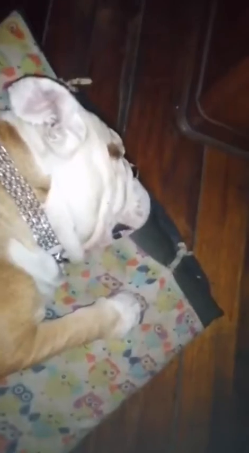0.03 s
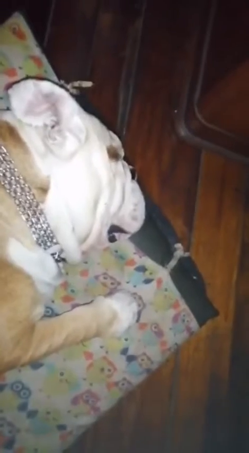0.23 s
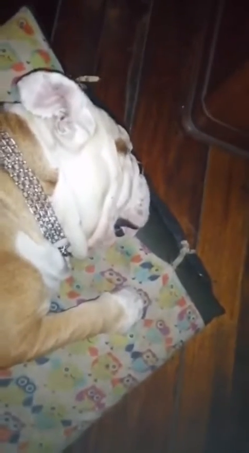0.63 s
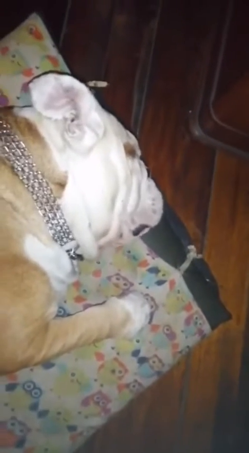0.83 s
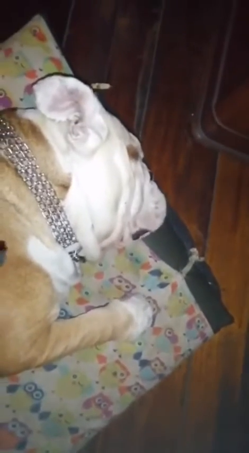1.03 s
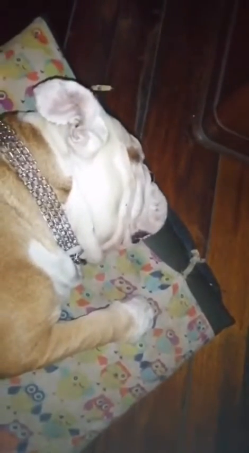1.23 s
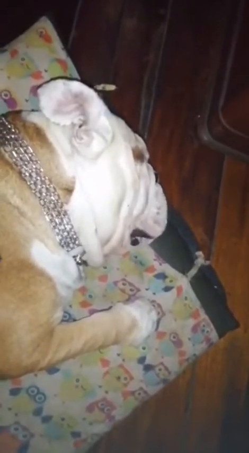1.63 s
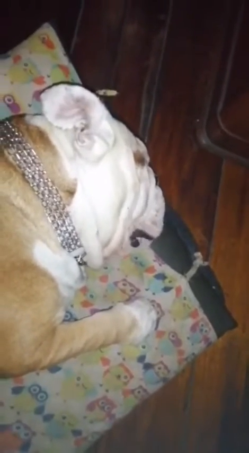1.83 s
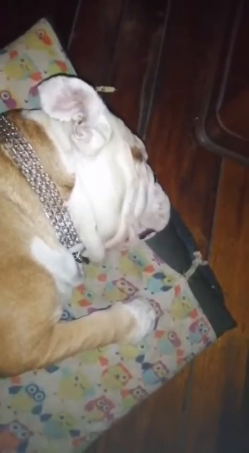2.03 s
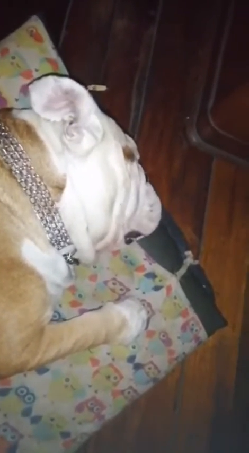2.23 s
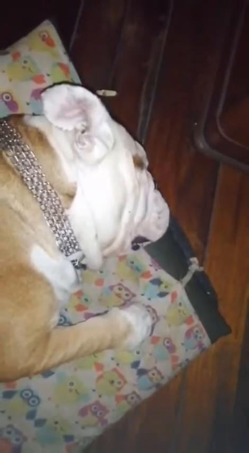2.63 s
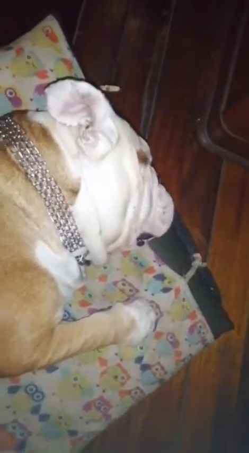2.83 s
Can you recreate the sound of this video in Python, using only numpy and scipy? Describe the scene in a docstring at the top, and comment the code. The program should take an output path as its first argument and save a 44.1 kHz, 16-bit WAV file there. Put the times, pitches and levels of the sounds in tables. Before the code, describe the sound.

A sleeping dog snores close to the microphone in a quiet room. Soft throaty clicks build into a rattling snore with a thin nasal hiss. A second snore follows, tightening into a short squeak and a soft puff.

```python
"""A quiet room, with the microphone close to a bulldog snoring on its cushion.
Its soft palate slaps shut singly, then in quick bouts, ringing a throat that widens and narrows twice.
Air rattles past the palate and hisses and whistles in the nose; the flutter tightens into a short
squeak, and a soft puff follows. Behind the dog are a short room tail and faint room tone."""
import sys
import numpy as np
from scipy import signal
from scipy.fft import rfft, irfft
from scipy.io import wavfile
from scipy.ndimage import uniform_filter1d

SR = 44100
rng = np.random.default_rng(int(sys.argv[2]) if len(sys.argv) > 2 else 0)


def output_pcm(signal):
    """Save a mono or channel-first signal as 16-bit PCM at the path in sys.argv[1].

    Samples are clipped to [-1, 1] before scaling.
    """
    pcm = np.clip(np.atleast_2d(signal).T, -1, 1) * 32767
    wavfile.write(sys.argv[1], SR, np.round(pcm).astype(np.int16))


N = 127890
T = np.arange(N) / SR
HZ = np.fft.rfftfreq(N, 1 / SR)


def amp(db):
    """Decibels to gain."""
    return 10 ** (np.asarray(db) / 20)


def unit_rms(x):
    """Scales to unit rms."""
    return x / np.sqrt(np.mean(x ** 2) + 1e-20)


def curve(rows, column=1):
    """One column of a time table at every sample."""
    rows = np.array(rows)
    return np.interp(T, rows[:, 0], rows[:, column])


def spectrum(points):
    """A frequency table at every bin."""
    hz, value = np.transpose(points)
    return np.interp(np.log(HZ + 1), np.log(hz + 1), value)


def pan(db):
    """Left and right gains whose mean is one."""
    gains = np.array([amp(db / 2), amp(-db / 2)]).reshape(2, -1)
    return gains / gains.mean(0)


def wander(hz):
    """Random drift of unit rms, mostly slower than hz."""
    return unit_rms(irfft(rfft(rng.standard_normal(N)) * np.exp(-(HZ / hz) ** 2), N))


def resonate(x, hz, width_hz):
    """A resonance of gain one whose centre follows hz."""
    turn = np.exp(2j * np.pi * np.cumsum(hz * np.ones(N)) / SR)
    pole = np.exp(-np.pi * width_hz / SR)
    return 2 * (turn * signal.lfilter([1 - pole], [1, -pole], x / turn + 1e-18)).real


def cut(x, hz, kind, order=2):
    """Low-pass or high-pass."""
    return signal.sosfilt(signal.butter(order, hz, kind, fs=SR, output="sos"), x)


# Likeness of left and right at the microphone: (frequency [Hz], correlation [ratio])
STEREO_LIKENESS = [(50,0.82),(500,0.69),(1500,0.26),(4000,0.31),(12000,0.088)]

def noise(colour):
    """Coloured noise, most alike left and right in the bass."""
    left, other = rfft(rng.standard_normal((2, N)))
    alike = spectrum(STEREO_LIKENESS)
    right = alike * left + np.sqrt(1 - alike ** 2) * other
    return unit_rms(irfft(np.array([left, right]) * amp(spectrum(colour)), N))


# The quiet room behind the dog: (frequency [Hz], gain [dB])
ROOM_TONE_COLOUR = [(25,-44),(55,-13.5),(84,-6),(120,-12.5),(1000,-29.5),(6000,-46.5),(7800,-43)]

def room_tone(level_db=-61.5):
    """A faint, steady, low rush all around the microphone."""
    return amp(level_db) * noise(ROOM_TONE_COLOUR)


# Floor and furniture near the microphone: (delay [s], left gain [ratio], right gain [ratio])
REFLECTIONS = [(.0034,0.028,0.6),(0.0151,0.11,0.35)]

def room(x, tail_db=-7, t60_s=0.24, onset_s=0.01, bass_edge_hz=283):
    """The direct sound, two reflections and a short diffuse tail; the room returns little bass."""
    t = T[:SR // 2]
    tail = rng.standard_normal((2, len(t))) * amp(-60 * t / t60_s) * (t > onset_s)
    tail = tail + 0.21 * tail[::-1]  # each side spills into the other
    tail *= amp(tail_db) / np.linalg.norm(tail[0])
    for delay, left, right in REFLECTIONS:
        tail[:, round(delay * SR)] += left, right
    wet = signal.fftconvolve(x, tail, axes=1)[:, :N]
    return x + irfft(rfft(wet) * HZ ** 2 / (HZ ** 2 + bass_edge_hz ** 2), N)


# The last puff, close by: (time [s], level [dB])
PUFF_ENVELOPE = [(2.76,-70),(2.81,-45),(2.85,-50.5),(2.9,-45.5)]
# Its colour: (frequency [Hz], gain [dB])
PUFF_COLOUR = [(110,-24),(240,2.5),(340,-10.5),(550,1),(950,-9.5),(1170,-16.5),(4000,-73.5)]

def puff():
    """A soft, dull breath after the squeak."""
    return noise(PUFF_COLOUR) * amp(curve(PUFF_ENVELOPE))


# Whistling at the nostrils: (time [s], level [dB])
WHISTLE_ENVELOPE = [(1.01,-87),(1.05,-50),(1.09,-45.5),(1.16,-57.5),(1.3,-58),(1.39,-73),(1.47,-58.5),(1.78,-59),(2.12,-74),(2.38,-64.5),(2.58,-64),(2.67,-85)]
# Their resonances: (frequency [Hz], width [Hz], gain in first snore [dB], gain in second [dB])
NOSTRIL_MODES = [(3010,640,-6.5,-5),(4740,190,-15.5,-7.5),(5490,410,-6,-13),(6320,420,-6,6),(9000,470,-2.5,-5),(9680,350,-2.5,-11)]

def whistle(second_snore_s=1.9, shift_s=0.35):
    """Air sings in narrow, drifting resonances of the nostrils; their balance shifts in the second snore."""
    second = np.clip((T - second_snore_s) / shift_s, 0, 1)
    out = np.zeros((2, N))
    for hz, width, first_db, second_db in NOSTRIL_MODES:
        centre = hz * (1 + 0.005 * wander(6))
        band = resonate(rng.standard_normal(N), centre, width)
        tone = unit_rms(resonate(band, centre, width))
        sides = pan(np.interp(hz, HZ, spectrum(NOSE_PAN)))
        out += sides * tone * amp(first_db + second * (second_db - first_db))
    return out * amp(curve(WHISTLE_ENVELOPE) + 2.3 * wander(60))


# Hiss at the nose, close up: (time [s], level [dB])
HISS_ENVELOPE = [(.45,-73.5),(.6,-56),(.98,-59),(1.08,-53.5),(1.38,-60),(1.72,-59.5),(1.76,-56.5),(2.12,-65),(2.58,-66),(2.7,-74.5),(2.83,-69),(2.89,-47.5)]
# Its colour: (frequency [Hz], gain [dB])
HISS_COLOUR = [(1900,-4),(2400,-10),(3100,-7),(3900,-14),(5700,-2),(6800,-4),(7800,-22),(9500,-18.5),(11500,-55.5)]
# Rush of air through the wide throat: (frequency [Hz], gain [dB])
RUSH_COLOUR = [(900,-29),(1650,2.5),(2200,0.5),(2800,-23),(6000,-4.5),(7900,-25),(10000,-19),(15000,-38.5)]
# Where the nose sits at the microphone: (frequency [Hz], left over right [dB])
NOSE_PAN = [(2000,-3),(6800,-9.5),(8800,18),(13000,12)]

def nose(hits, spurt_s=0.006, spurt_db=16.5, rush_db=-16, rush_db_per_hz=0.25):
    """Hiss and rush of air spurt at each slap; the rush fades as the throat narrows."""
    spurts = signal.lfilter([1], [1, -np.exp(-1 / (spurt_s * SR))], hits)
    pulsing = np.exp(0.28 * wander(62)) * (1 + amp(spurt_db) * uniform_filter1d(spurts, size=130))
    narrowing_db = rush_db_per_hz * (curve(THROAT_MODES) - WIDE_HZ)
    hiss = noise(HISS_COLOUR) * amp(curve(HISS_ENVELOPE))
    rush = noise(RUSH_COLOUR) * amp(rush_db + curve(RATTLE_ENVELOPE) + narrowing_db)
    return irfft(rfft((hiss + rush) * pulsing) * pan(spectrum(NOSE_PAN)), N)


# The closing squeak: (time [s], pitch [Hz], level [dB])
SQUEAK_PATH = [(2.47,410,-48),(2.515,420,-28),(2.55,441,-25),(2.58,434,-19.5),(2.595,420,-24),(2.607,385,-38),(2.645,430,-39),(2.67,470,-52),(2.712,497,-34),(2.745,500,-58)]

def squeak(harmonics_db=(0, -0.5, -29.5, -41), pure_from_s=2.68):
    """The tightened palate sings briefly and ends in a pure tone."""
    phase = 2 * np.pi * np.cumsum(curve(SQUEAK_PATH) * (1 + 0.0036 * wander(100))) / SR
    bright = np.clip((pure_from_s - T) / 0.016, 0, 1)
    tone = sum(amp(db) * np.sin((k + 1) * phase) * bright ** k for k, db in enumerate(harmonics_db))
    sounding = (T > SQUEAK_PATH[0][0]) * (T < SQUEAK_PATH[-1][0])
    return tone * amp(curve(SQUEAK_PATH, column=2)) * sounding


# How strongly the palate shakes the chest: (time [s], gain [dB])
CHEST_DRIVE = [(.25,-53),(.6,-27),(.9,-26),(1.12,-7),(1.4,-3.5),(1.62,-13),(1.9,-18.5),(2.3,-4),(2.6,-16.5)]
# The chest from close by: (frequency [Hz], gain [dB])
CHEST_COLOUR = [(30,-29.5),(55,-12),(80,0),(195,-3.5),(245,4),(330,-11.5),(900,-50.5)]

def chest(drive):
    """The chest answers the palate with a low thud."""
    cepstrum = irfft(np.log(amp(spectrum(CHEST_COLOUR))), N)
    causal = cepstrum * (1 + np.sign(np.fft.fftfreq(N)))  # rings only after the blow
    ring = irfft(np.exp(rfft(causal)), N)[:SR // 10]
    thud = signal.fftconvolve(drive * amp(curve(CHEST_DRIVE)), ring)[:N]
    return cut(thud, 4000, "low")


# The throat's two lowest resonances: (time [s], first [Hz], second [Hz])
THROAT_MODES = [(.25,543,864),(.53,722,805),(.68,751,1220),(.81,779,1066),(.88,638,825),(.93,538,910),(1.02,523,813),
                (1.35,437,773),(1.58,511,937),(1.72,660,923),(1.76,792,1104),(2,780,1000),(2.1,577,980),(2.22,483,805),(2.65,468,878)]
# Its third, which sinks and grows as the throat narrows: (time [s], frequency [Hz], gain [dB])
THIRD_MODE = [(.25,1430,-18),(.5,1562,-14.5),(.88,1606,-17.5),(.96,1136,-12),(1.11,1060,-15),(1.24,1530,-17.5),(1.93,1573,-20),(2.06,1160,-13.5),(2.22,1030,-17.5),(2.34,1600,-20)]
NARROW_HZ, WIDE_HZ = 473.6, 811.6  # first resonance of a narrow and a wide throat

def throat(drive):
    """Four moving resonances; the lower two are damped more as the throat opens."""
    first, second, third = curve(THROAT_MODES), curve(THROAT_MODES, column=2), curve(THIRD_MODE)
    opening = np.clip((first - NARROW_HZ) / (WIDE_HZ - NARROW_HZ), 0, 1)
    narrow = resonate(drive, first, width_hz=100) + amp(-3) * resonate(drive, second, width_hz=126)
    wide = resonate(drive, first, width_hz=138) + amp(-3) * resonate(drive, second, width_hz=138)
    ring = np.sqrt(1 - opening) * cut(narrow, 1025, "low", order=7)
    ring += np.sqrt(opening) * amp(-1.5) * cut(wide, 1167, "low", order=5)
    for hz, db in (third, 0), (third * 1.246, -16.5):  # the fourth follows the third
        band = resonate(drive, hz, width_hz=240)
        ring += amp(db + curve(THIRD_MODE, column=2)) * resonate(band, hz, width_hz=240)
    return cut(cut(ring, 2200, "low", order=8), 390, "high", order=4)


# Air rattling past the palate: (time [s], relative level [dB])
RATTLE_ENVELOPE = [(.54,-69),(.59,-35),(.67,-22.5),(.78,-33),(.9,-27.5),(1.05,-24.5),(1.25,-31.5),(1.38,-45.5),(1.62,-41),(1.82,-30.5),(2.12,-30.5),(2.52,-25),(2.57,-52),(2.64,-28.5),(2.68,-73)]

def rattle(flutter_hz=127.2, jitter=0.3, swing_db=3, gain_db=17.5):
    """The palate flutters unevenly, letting a puff of air through at each beat."""
    cycles = np.cumsum(flutter_hz * np.exp(jitter * wander(90))) / SR
    beats = np.diff(np.floor(cycles), prepend=0) * amp(swing_db * wander(74))
    puffs = np.exp(-(cycles % 1) / 0.2) * rng.standard_normal(N)
    air = unit_rms(unit_rms(beats) + 0.43 * unit_rms(puffs)) * amp(curve(RATTLE_ENVELOPE) + gain_db)
    dull = resonate(air, 0.63 * curve(THROAT_MODES, column=2), width_hz=465)
    return dull + 0.17 * air  # a little raw air gives bite


# Single slaps of the palate: (time [s], relative level [dB])
SINGLE_SLAPS = [(.2638,-17),(.3992,-16.5),(.4834,-11.5),(.5228,-10),(.5621,-7),(.729,-13),(.7345,-5.5),(.7775,-11),(.7835,-5.5),(.884,-8),(.9647,-6.5),(1.776,-9.5),(1.7968,-7),(1.8085,-12),(1.8458,-9),(1.887,-7.5),(1.937,-11),(1.947,-10.5),(1.9838,-8),(1.992,-13),(2.021,-14)]
# Quick bouts: (time [s], relative level of first slap [dB], length [s], slap spacing [s])
SLAP_BOUTS = [(.224,-16,.005,0.0038),(0.592,-9,.016,0.0063),(0.633,-11.5,.022,0.0066),(.683,-11,.014,0.0042),(0.8113,-6.5,.006,0.0024),(0.8483,-11.5,.009,0.0064),(.8715,-8.5,.007,0.0025),
              (0.89,-15.5,.013,0.0058),(.941,-13.5,.007,0.00494),(.991,-19.5,.022,.0055),(1.057,-15.5,.009,.0038),(1.092,-14,.02,0.0078),(1.14,-21.5,.035,0.0097),(1.206,-20.5,.024,0.011),(1.291,-15.5,.02,0.0061),
              (1.353,-15.5,.018,0.011),(1.404,-15.5,.018,0.012),(1.451,-13.5,.018,.012),(1.499,-12,.018,.01),(1.545,-10,.018,0.013),(1.5917,-10.5,.018,0.011),(1.641,-11.5,.029,0.012),
              (1.691,-12,.018,0.012),(1.7497,-9,.016,0.011),(2.047,-12.5,.013,0.0053),(2.089,-15,.016,0.0063),(2.143,-19,.014,0.0061),(2.198,-18,.016,0.0076)]

def slaps(swell_db_per_slap=0.55):
    """The soft palate slaps shut, singly or in evenly spaced runs that swell."""
    hits = np.zeros(N)
    for start, db in SINGLE_SLAPS:
        hits[round(start * SR)] += amp(db)
    for start, db, length, gap in SLAP_BOUTS:
        k = np.arange(int(length / gap) + 1)
        hits[np.round((start + k * gap) * SR).astype(int)] += amp(db + k * swell_db_per_slap)
    return hits


def snore(hits, slap_db=32):
    """Slaps and rattle ring the throat and chest, right by the microphone."""
    drive = hits * amp(slap_db) + rattle()
    return cut(throat(drive) + chest(drive), 40, "high")


def scene(right_lag_s=0.0001):
    """The dog close up over room tone, a little to the left: its sound reaches the right side later."""
    hits = slaps()
    left, right = snore(hits) + squeak() + nose(hits) + whistle() + puff()
    late_right = np.pad(right, (round(right_lag_s * SR), 0))[:N]
    return room(np.array([left, late_right])) + room_tone()


def record(dry):
    """The recorder's band ends at 15.7 kHz."""
    band_limit = signal.firwin(511, 15700, window=("kaiser", 9), fs=SR)
    return signal.oaconvolve(dry, band_limit[None], "same")


dry = scene()
out = record(dry)
output_pcm(out)
```